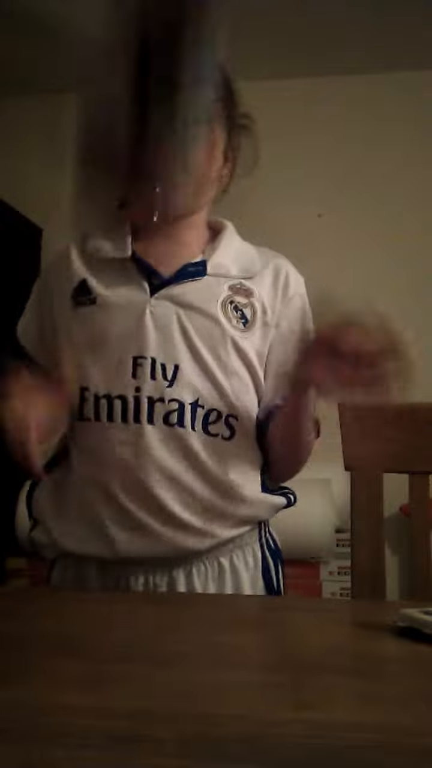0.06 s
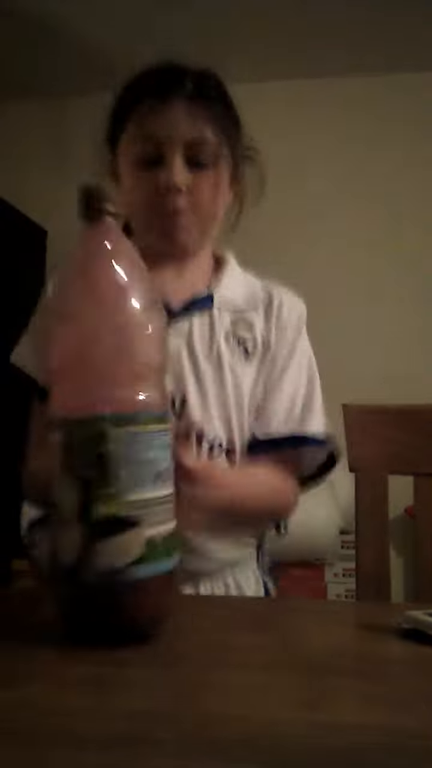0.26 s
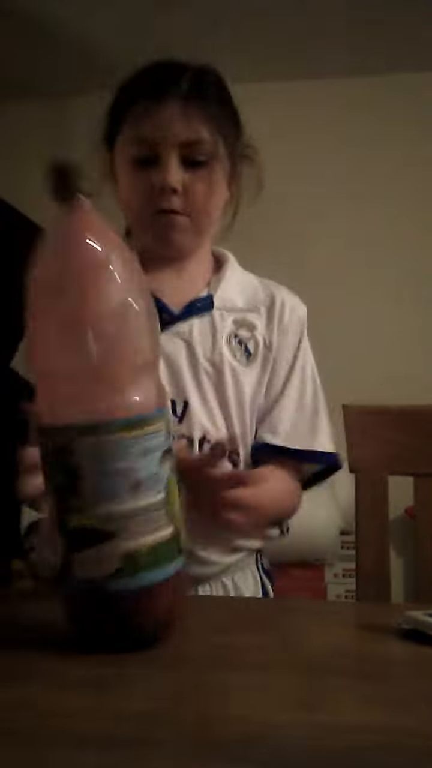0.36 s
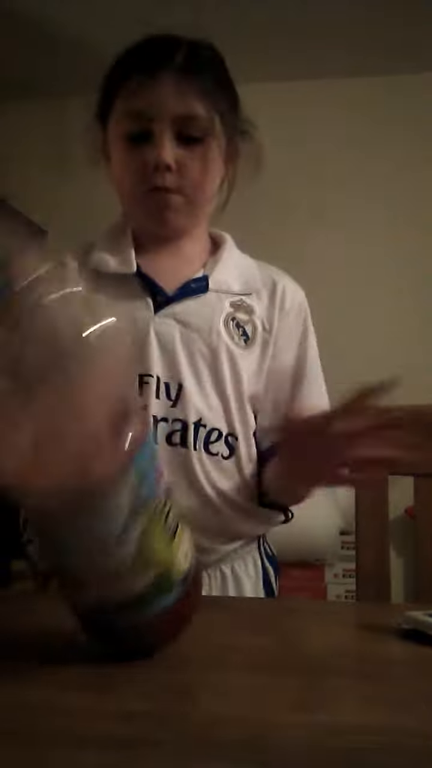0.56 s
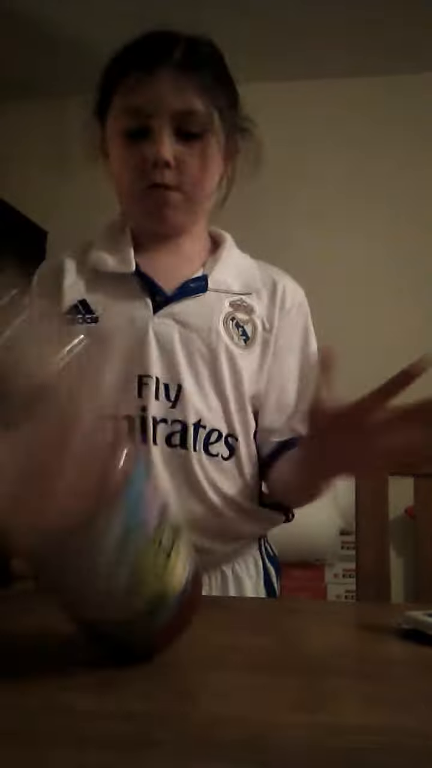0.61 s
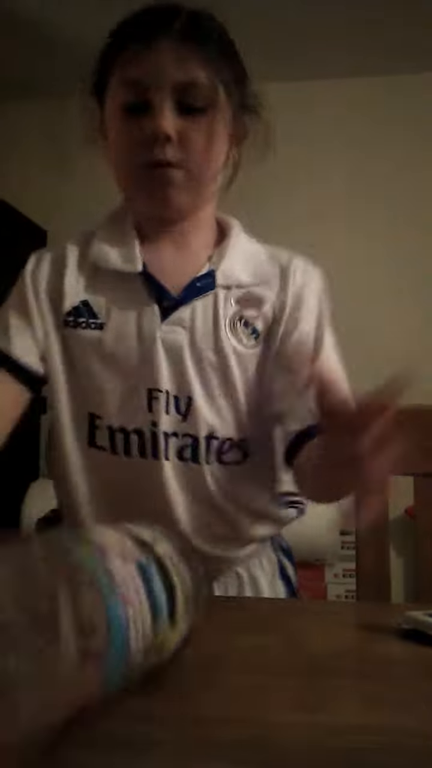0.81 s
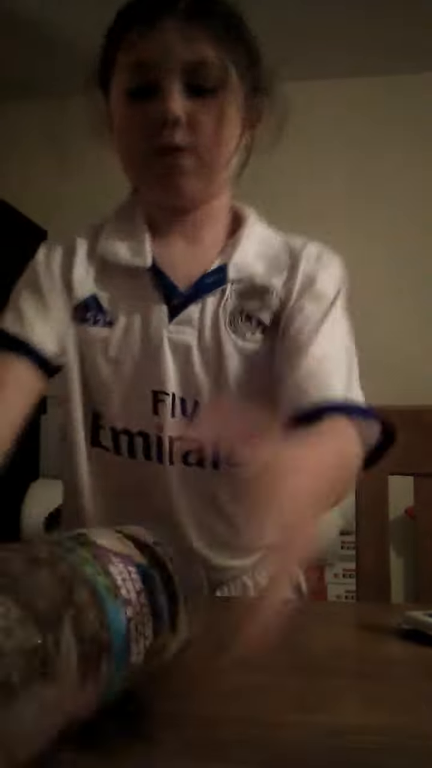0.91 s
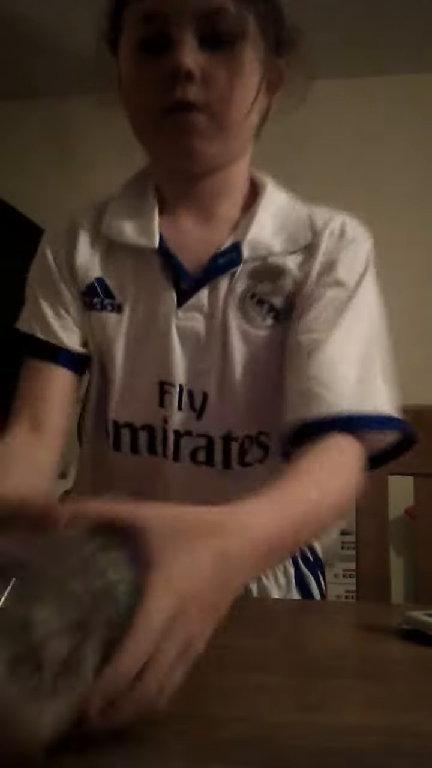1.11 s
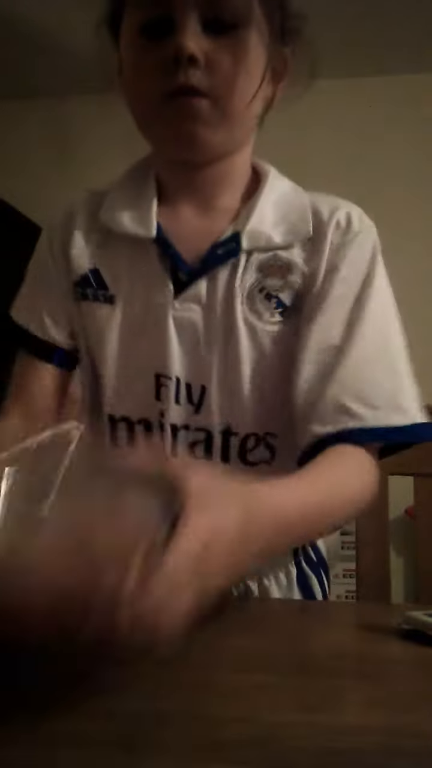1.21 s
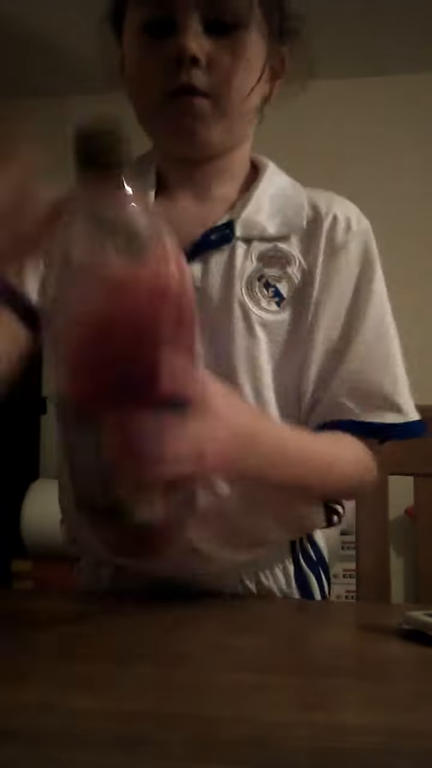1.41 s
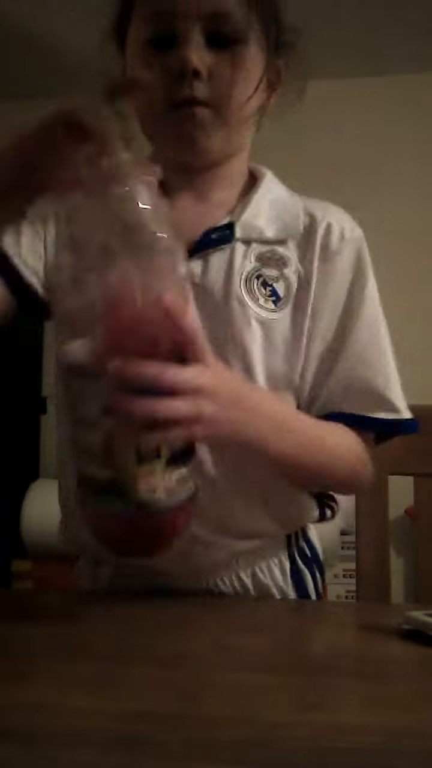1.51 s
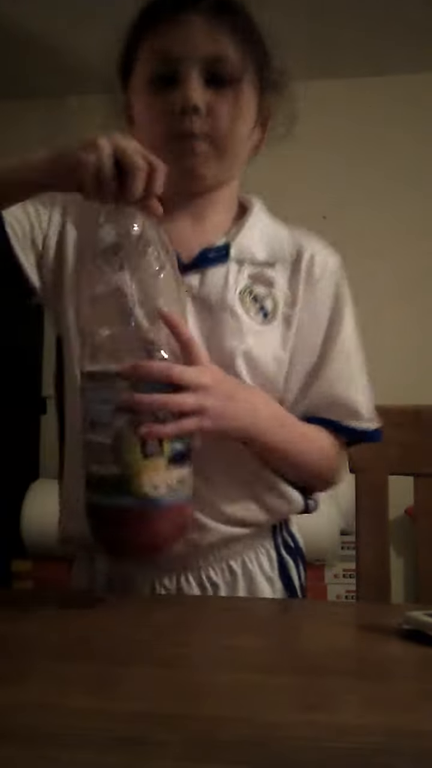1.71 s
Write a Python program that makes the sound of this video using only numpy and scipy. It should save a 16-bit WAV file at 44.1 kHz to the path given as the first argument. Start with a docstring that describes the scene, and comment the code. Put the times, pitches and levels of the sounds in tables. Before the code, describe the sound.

A large part-full plastic bottle lands on a wooden table with a thud, crack and slosh. It topples, bounces, slides with a faint squeak, then is picked up with light crinkles. Heard close by in a small quiet room.

```python
"""Two faint ticks, then a big plastic bottle, part full, lands base first on a wooden table at 0.23 s.
It tips onto its side at 0.77 s and bounces. Each blow thumps the wood and cracks the thin shell,
and the drink sloshes. From 0.9 s the bottle slides with a faint squeak; a hand damps its boom,
then picks it up with crinkles and a soft bump at 1.54 s.
All in a small quiet room, heard close by through two microphones, the right one muffled."""
import sys
import numpy as np
from scipy import signal
from scipy.fft import rfft, irfft
from scipy.io import wavfile
from scipy.ndimage import uniform_filter1d, minimum_filter1d

SR = 44100
rng = np.random.default_rng(int(sys.argv[2]) if len(sys.argv) > 2 else 0)


def generate_wav(signal):
    """Clip the signal to [-1, 1] and save it as 16-bit WAV at the path in sys.argv[1]."""
    frames = np.transpose(np.atleast_2d(signal))
    scaled = np.clip(frames, -1, 1) * 32767
    pcm = np.round(scaled).astype(np.int16)
    wavfile.write(sys.argv[1], SR, pcm)


N = 77175
T = np.arange(N) / SR
HZ = np.fft.rfftfreq(2 * N, 1 / SR)
CONTACT_S = 0.00069
WOOD_LAG_S = 0.001177  # the shell cracks first, then the drink's weight reaches the wood

# Blows on the table. Each row: start in seconds; relative levels in dB of thud, table ring, crack,
# shell ring and boom; crack tilt in dB per octave.
BOTTLE_BLOWS = [(0.2255, 0.5, 1, -1.5, -10.5, -25, -6), (0.2445, -3.5, -1, -39, -35, -37, 1),
                (0.2483, -11, -22, -33, -30, -35, 1), (0.2980, -19, -4.5, -14.5, -29, -37, -1),
                (0.3100, -6, -20, -22, -35, -35, -2), (0.3180, -5, -2.5, -18, -20, -35, -5),
                (0.3559, -12, -23.5, -18, -26, -30, -6.5), (0.3750, -21, -17, -15, -17, -35, -9),
                (0.7729, -1, -4, -7.5, 0, 2, 1.5), (0.7810, -7.5, -14.5, -21, -26, -30, -9.5),
                (0.8288, -22, -46, -15.5, -43, -28, -4), (0.882, -12, -42, -10.5, -17, 2.5, 0.5),
                (0.8920, -34, -37, -14.5, -14.5, -29, 1.5), (0.9066, -28, -38, -15.5, -28, -29, -1.5),
                (1.056, -20.5, -29, -37, -37, -14, 6.5)]
# Modes. Each row: frequency in Hz, relative level in dB, t60 in seconds.
TABLETOP_MODES = [(116, -4, 0.17), (154, 0, 0.12), (184, -23, 0.26), (229.8, 5, 0.4), (266, -8, 0.42),
                  (331.5, -0.5, 0.13), (386, -27, 0.13), (433, -6.5, 0.62), (502, 1, 0.19),
                  (545.7, -5, 0.37), (592, -4, 0.37), (848, -9.5, 0.28), (1025, 3, .15)]
SHELL_MODES = [(540, -7, 0.02), (1050, -11, 0.038), (1804, -8, 0.017), (2900, 5.5, 0.016),
               (3730, -6.5, 0.016), (4020, -12, 0.013), (5450, -3.5, .016), (7900, -33, 0.0058)]
BOOM_MODES = [(133.6, -1, 0.87)]  # filled bottle on its side
SWAY_MODES = [(61.54, -0.5, 1)]  # whole table on its legs


def blow_rings(grab_s=1.07, grab_t60_s=0.12):
    """Each blow thuds and rings table, shell and filled bottle; a hand then damps the boom."""
    thud = ring([(174, -4, 0.017)])
    table = amp(-24.5) * ring(TABLETOP_MODES)
    shell = amp(-10.5) * ring(SHELL_MODES)
    boom = amp(-27.5) * ring(BOOM_MODES)
    sway = amp(-27.5) * ring(SWAY_MODES)
    out, booms = np.zeros(N), np.zeros(N)
    for at, thud_db, table_db, _, shell_db, boom_db, _ in BOTTLE_BLOWS:
        add(out, at, amp(shell_db) * shell)
        add(out, at + WOOD_LAG_S, amp(thud_db) * thud + amp(table_db) * table + amp(boom_db) * sway)
        add(booms, at, amp(boom_db) * boom)
    return out + booms * fade(grab_t60_s, start_s=grab_s)


# Two faint ticks, perhaps clothing, before the landing; then crinkles of the shell.
# Each row: start in seconds, relative level in dB, tilt in dB per octave.
TICKS = [(0.0565, -31, 3), (0.1295, -36, 2), (0.2048, -30, 0), (0.2380, -18, 5), (0.3610, -28, 8),
         (0.6590, -27, 4), (1.2600, -29, 4), (1.5020, -31, 1), (1.5700, -35, 1), (1.6315, -28, 2)]
# Noise spectra of wood and shell. Each row: frequency in Hz, relative level in dB.
KNOCK_SPECTRUM = [(30, -27), (70, -1), (150, 0.5), (300, -4), (450, -5), (800, -2), (1100, -10),
                  (2000, -15), (5000, -31.5), (16000, -53)]
CRACK_SPECTRUM = [(100, -8.5), (500, -10.5), (1000, 1), (1500, 0.5), (2400, 1.5), (3500, 1), (4500, -1.5),
                  (6300, -9), (8200, -10), (11000, -21.5), (13000, -27), (16000, -45)]


def knocks_and_cracks():
    """Each blow knocks the wood and buckles the shell with a crack; ticks are small cracks alone."""
    out, wood, bright = np.zeros(N), noise(KNOCK_SPECTRUM), noise(CRACK_SPECTRUM)
    for at, thud_db, _, crack_db, _, _, tilt_db in BOTTLE_BLOWS:
        add(out, at + WOOD_LAG_S, amp(thud_db - 11) * burst(wood, t60_s=0.039))
        add(out, at, amp(crack_db) * crack(bright, tilt_db))
    for at, db, tilt_db in TICKS:
        add(out, at, amp(db) * crack(bright, tilt_db))
    return out


def crack(source, tilt_db, size=4096):
    """A short burst, made brighter or duller by the given tilt."""
    hz = np.fft.rfftfreq(2 * size, 1 / SR)
    octaves = np.log2(np.clip(hz, 600, 8000) / 3000)
    snap = amp(-3.5) * burst(source, t60_s=0.021)[:size]
    return irfft(rfft(snap, 2 * size) * amp(tilt_db * octaves))[:size]


# Surges of the drink. Each row: start, rise, hold and fall t60 in seconds, level in dB.
DRINK_SURGES = [(0.235, 0.067, 0.028, 0.19, -20), (0.785, 0.0033, 0.12, 0.39, -32.5),
                (1.02, 0.052, 0.021, 0.089, -43.5)]
# Liquid on the walls. Each row: frequency in Hz, relative level in dB.
SLOSH_SPECTRUM = [(30, -15), (70, -9), (150, -1.5), (250, 0), (350, -6.5), (550, -4), (1100, -10),
                  (2200, -14), (4300, -20.5), (5600, -33), (9000, -34), (13000, -47.5), (16000, -54)]


def slosh(bubbles_per_s=160, centre_hz=424, life_cycles=24, glide=0.11):
    """Liquid slaps the walls and traps bubbles that glide upward."""
    bubbles = np.zeros(N)
    for when, pitch, strength in rng.random((round(bubbles_per_s * N / SR), 3)):
        hz = centre_hz * 4 ** (2 * pitch - 1)
        life_s = life_cycles / hz
        t = T[:int(life_s * SR)]
        chirp = np.sin(2 * np.pi * hz * t * (1 + glide * t / life_s))
        decay = np.exp(-np.log(1000) * t / life_s)
        add(bubbles, when * N / SR, strength ** 2 * chirp * decay)
    slaps = grains(SLOSH_SPECTRUM, per_s=1500, spread_db=3.5)
    return swell(DRINK_SURGES) * (slaps + amp(-4) * unit(bubbles))


# Envelopes. Each row: start, rise, hold and fall t60 in seconds, level in dB.
SLIDE_SWELLS = [(0.9, 0.092, 0.17, 0.54, -37.5)]
SQUEAK_SWELLS = [(1.07, 0.02, 0.039, 0.22, -46.5)]
RUSTLE_SWELLS = [(0.655, 0.0045, 0.042, 0.27, -49.5), (1.255, 0.0062, 0.025, 0.87, -51),
                 (1.625, 0.007, 0.01, 0.13, -59)]
# Spectra. Each row: frequency in Hz, relative level in dB.
SLIDE_SPECTRUM = [(100, -22), (600, -9.5), (1100, 7.5), (1500, 4), (1760, 9.5), (2000, 2.5), (3800, 2.5),
                  (6000, -15.5), (8000, -19), (14000, -34.5)]
RUSTLE_SPECTRUM = [(300, -10), (1500, -8), (2800, -7), (3900, 2), (6000, -9.5), (8500, -14), (12000, -31),
                   (16000, -24)]


def slide_and_rustles(squeak_hz=1765, half_width_hz=20):
    """Plastic slides on wood with a faint rough squeak; also faint, short, high hissy rustles."""
    resonance = 1 / (1 + ((HZ - squeak_hz) / half_width_hz) ** 2)
    squeak = swell(SQUEAK_SWELLS) * filtered_noise(resonance)
    slide = swell(SLIDE_SWELLS) * grains(SLIDE_SPECTRUM, per_s=4000, spread_db=3.5)
    rustle = swell(RUSTLE_SWELLS) * grains(RUSTLE_SPECTRUM, per_s=2000, spread_db=2.5)
    return slide + squeak + rustle


# Bottle in the hand. Each row: frequency in Hz, relative level in dB, t60 in seconds.
HELD_MODES = [(145, 1, 0.034), (232, 2.5, 0.053), (356, 1, 0.04), (464, -5, 0.049), (626, 2.5, 0.016)]


def lift_bump(start_s=1.5425):
    """A soft bump as the bottle is lifted, its modes deadened by the hand."""
    out = np.zeros(N)
    add(out, start_s, amp(-32) * ring(HELD_MODES))
    return out


# Reverberation. Each row: band centre in Hz, t60 in seconds, gain in dB.
ROOM_BANDS = [(59.5, 0.81, 0.5), (187, .45, -7), (600, 0.5, -3.5), (1670, 0.55, -6.5), (4500, 0.55, -2.5),
              (8800, 0.34, -2.5), (16000, 0.23, -7)]


def room(x, build_s=0.0049):
    """Diffuse stereo tail that builds quickly and dies sooner in the treble."""
    spectrum = rfft(pair(*rng.standard_normal((2, N))), 2 * N)
    tail = 0
    for k, (_, t60_s, db) in enumerate(ROOM_BANDS):
        band = curve([(row[0], j == k) for j, row in enumerate(ROOM_BANDS)])
        envelope = fade(t60_s) * (1 - np.exp(-T / build_s))
        envelope /= np.linalg.norm(envelope)
        tail = tail + amp(db) * irfft(spectrum * band)[:, :N] * envelope
    return signal.fftconvolve(x[None], tail, axes=1)[:, :N]


# Room noise. Each row: frequency in Hz, relative level in dB.
BACKGROUND_SPECTRUM = [(25, -18), (60, -6), (130, -2), (200, -4), (400, -7), (680, -4), (1050, -10),
                       (1400, -11), (1800, -15), (2700, -14), (4000, -14), (6200, -24), (8000, -27),
                       (16000, -47)]


def background(hum_hz=636):
    """Quiet room noise with a faint steady tone."""
    air = pair(noise(BACKGROUND_SPECTRUM), noise(BACKGROUND_SPECTRUM))
    return amp(-47) * air + amp(-56.5) * np.sin(2 * np.pi * hum_hz * T)


def amp(db):
    """Decibels to gain."""
    return 10 ** (np.asarray(db) / 20)


def unit(x):
    """Scale to rms 1."""
    return x / (np.std(x) + 1e-12)


def curve(points):
    """Interpolate (Hz, value) points onto HZ along a log axis."""
    hz, values = np.array(points).T
    return np.interp(np.log(HZ + 1e-3), np.log(hz), values)


def shape(x, points):
    """Minimum-phase filter through (Hz, dB) points."""
    cepstrum = irfft(np.log(amp(curve(points))))
    cepstrum[1:N] *= 2
    cepstrum[N + 1:] = 0
    return irfft(rfft(x, 2 * N) * np.exp(rfft(cepstrum)))[..., :N]


def filtered_noise(gain):
    """Noise at rms 1, weighted by a gain per frequency."""
    return unit(irfft(rfft(rng.standard_normal(2 * N)) * gain)[:N])


def noise(points):
    """Steady noise coloured by (Hz, dB) points."""
    return filtered_noise(amp(curve(points)))


def fade(t60_s, start_s=0):
    """Hold at 1 until start_s, then decay exponentially."""
    return np.exp(-np.log(1000) * np.clip((T - start_s) / t60_s, 0, 10))


def ring(modes):
    """(Hz, dB, t60 s) modes pushed over one contact; neighbours swing in opposite directions."""
    push = np.minimum(T / CONTACT_S, 1)
    return push * sum((-1) ** k * amp(db) * np.sin(2 * np.pi * hz * T) * fade(t60_s)
                      for k, (hz, db, t60_s) in enumerate(modes))


def burst(source, t60_s):
    """A random stretch of noise that builds over one contact, then dies."""
    return np.roll(source, rng.integers(N)) * np.minimum(T / CONTACT_S, 1) * fade(t60_s)


def swell(rows):
    """Sum of rise, hold and fall envelopes."""
    return sum(amp(db) * np.clip((T - at) / rise_s, 0, 1) * fade(t60_s, at + rise_s + hold_s)
               for at, rise_s, hold_s, t60_s, db in rows)


def grains(points, per_s, spread_db):
    """Dense tiny clicks of uneven size, coloured by (Hz, dB) points."""
    sizes = amp(spread_db * np.minimum(rng.exponential(size=N), 4))
    signs = rng.choice([-1, 1], N)
    fires = rng.random(N) < per_s / SR
    return unit(shape(sizes * signs * fires, points))


def add(out, at, x):
    """Mix x in at a time in seconds."""
    i = int(np.clip(at * SR, 0, N - 1))
    out[i:i + len(x)] += x[:N - i]


def pair(left, other, alike_below_hz=250):
    """Two channels from two unrelated signals, alike in the bass."""
    share = HZ / (HZ + alike_below_hz)
    right = irfft(rfft(left, 2 * N) * np.sqrt(1 - share) + rfft(other, 2 * N) * np.sqrt(share))
    return np.array([left, right[:N]])


def scene():
    """Bottle, room and background; the noisy parts reach each microphone differently."""
    noisy = pair(*(knocks_and_cracks() + slosh() + slide_and_rustles() for _ in range(2)))
    rings = blow_rings() + lift_bump()
    return noisy + rings + background() + room(noisy[0] + amp(-13) * rings)


# Muffled right microphone. Each row: frequency in Hz, gain in dB.
RIGHT_RESPONSE = [(40, -6), (150, -1.5), (400, -1.5), (800, -1), (1050, -9), (1400, -10.5), (2500, -14),
                  (4200, -23), (7000, -14), (10000, -9), (16000, 0)]


def record(dry, right_lag_s=0.00019, low_cut_hz=47, high_cut_hz=15700, ceiling=0.88, hiss_db=-70):
    """Right microphone late and muffled; then low cut, peak limiter, hiss and high cut."""
    right = np.interp(T - right_lag_s, T, shape(dry[1], RIGHT_RESPONSE))
    low_cut = signal.butter(2, low_cut_hz, "high", fs=SR, output="sos")
    both = signal.sosfilt(low_cut, [dry[0], right])
    window = int(0.001 * SR)
    gain = ceiling / np.maximum(np.abs(both), ceiling)
    gain = uniform_filter1d(minimum_filter1d(gain, 2 * window), window)
    both = both * gain + amp(hiss_db) * rng.standard_normal((2, N))
    high_cut = signal.ellip(8, 0.2, 80, high_cut_hz, fs=SR, output="sos")
    return signal.sosfilt(high_cut, both)


dry = scene()
out = record(dry)
generate_wav(out)
```